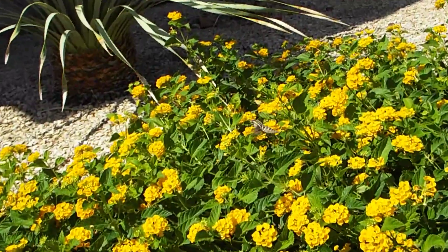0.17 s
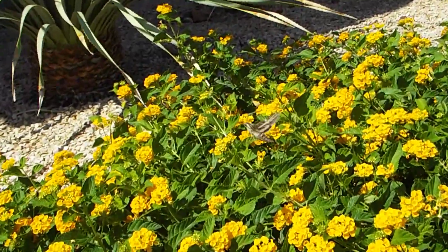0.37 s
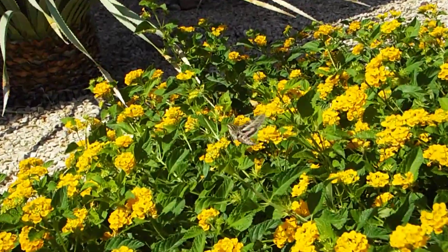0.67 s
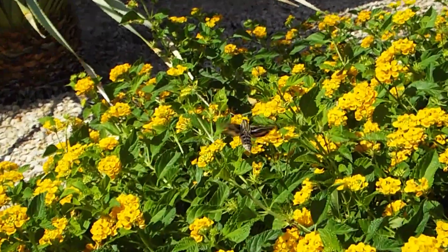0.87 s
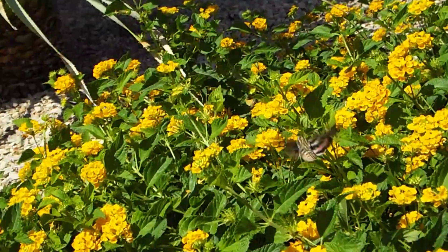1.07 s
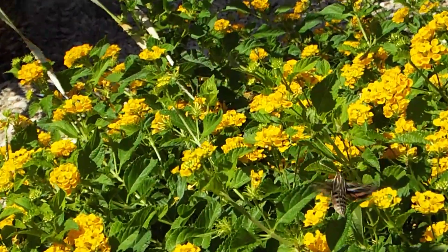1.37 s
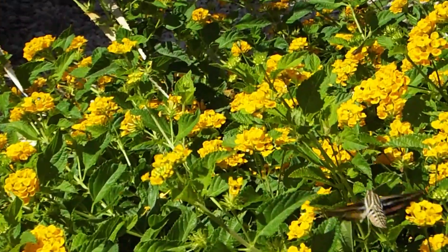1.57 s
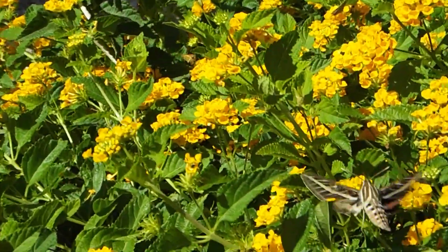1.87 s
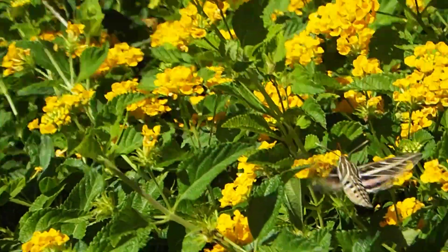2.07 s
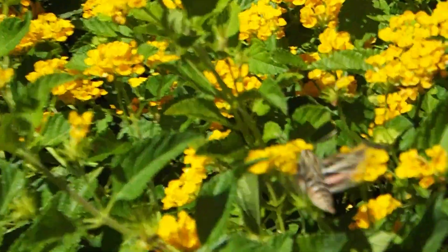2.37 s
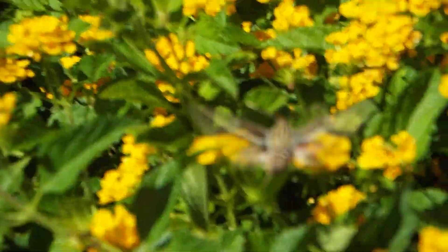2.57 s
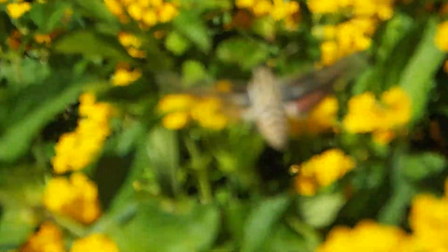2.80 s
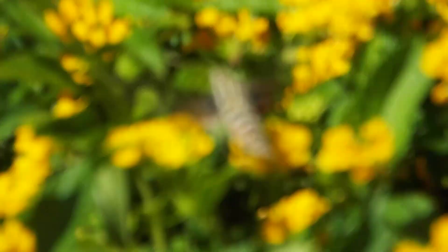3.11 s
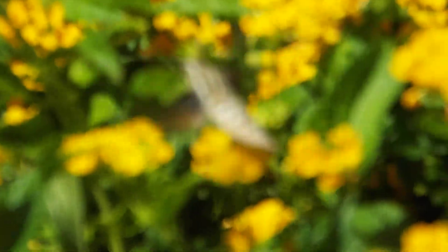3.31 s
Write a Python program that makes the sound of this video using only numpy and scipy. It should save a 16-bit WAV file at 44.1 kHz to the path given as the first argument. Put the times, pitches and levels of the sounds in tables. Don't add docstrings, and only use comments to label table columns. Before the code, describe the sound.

Close buzzy whirr of a camera zoom motor with light case ticks, ending abruptly outdoors.

```python
import sys
import numpy as np
from scipy import signal
from scipy.io import wavfile
from scipy.ndimage import uniform_filter1d

SR = 44100
rng = np.random.default_rng(int(sys.argv[2]) if len(sys.argv) > 2 else 0)


def makeup_ratio(level_db):
    decades = np.asarray(level_db, float) / 20
    return 10 ** decades


def unload_wav(signal):
    wavfile.write(
        sys.argv[1],
        SR,
        np.round(np.clip(np.atleast_2d(signal).T, -1, 1) * 32767).astype(np.int16),
    )


N = 152145


def evened(x):
    return x / np.sqrt(np.mean(x ** 2) + 1e-20)


def read(points, hz):
    point_hz, value = np.transpose(points)
    return np.interp(np.log(hz + 1), np.log(point_hz + 1), value)


def filtered(x, order, hz, kind="low"):
    return signal.sosfilt(signal.butter(order, hz, kind, fs=SR, output="sos"), x)


def slow(hz):
    return evened(filtered(rng.standard_normal(N), 2, hz))


def ring(x, hz, t60_s):
    t = np.arange(1500) / SR
    mode = makeup_ratio(-60 * t / t60_s) * np.sin(2 * np.pi * hz * t)
    return signal.oaconvolve(x, mode)[:len(x)]


def add(mix, start_s, sound):
    part = mix[:, round(start_s * SR):][:, :sound.shape[1]]
    part += sound[:, :part.shape[1]]


def rumble():
    # freq [Hz], density [dB per Hz]
    air = [(20, -3.5), (60, -0.5), (200, -8.5), (350, -18), (650, -20.5), (1000, -28.5), (5000, -36.5),
           (16000, -48)]
    # center_hz [Hz], width_hz [Hz], level_db [dB]
    hums = [(60.5, 6, -57), (115, 16.2, -55.5), (168, 3, -75.5), (250, 5.3, -65.5)]
    # freq [Hz], correlation [-]
    likeness = [(30, 0.6), (80, 1.03), (300, 0.8), (900, 1.05), (4000, .5), (15000, 0.5)]
    # freq [Hz], left_over_right_db [dB]
    balance = [(60, 5.3), (300, 4), (900, 4.5), (4000, 2.4), (15000, 2.1)]
    wash_db, patch_db = -51, 1.47

    frames, hz = N // 1024 + 5, np.fft.rfftfreq(4096, 1 / SR)
    a, b, c, d, patches = rng.standard_normal((frames, 2049, 5)).T
    patches = uniform_filter1d(patches, size=12, axis=0)
    patches = evened(uniform_filter1d(patches, size=4, axis=1))

    wash = makeup_ratio(2 * read(air, hz))
    power = makeup_ratio(2 * wash_db) * wash / wash.sum()
    for center_hz, width_hz, level_db in hums:
        hum = np.exp(-((hz - center_hz) / width_hz) ** 2)
        power = power + makeup_ratio(2 * level_db) * hum / hum.sum()

    same = np.clip(read(likeness, hz), -1, 1)[:, None]
    left = a + 1j * b
    right = same * left + np.sqrt(1 - same ** 2) * (c + 1j * d)
    gain = np.sqrt(power) * makeup_ratio(np.outer([.5, -.5], read(balance, hz)))
    spectra = np.array([left, right]) * gain[:, :, None] * makeup_ratio(patch_db * patches)
    out = signal.istft(spectra, nperseg=4096, noverlap=3072)[1][:, 2048:N + 2048]
    return evened(out) * np.sqrt(power.sum())


def finger_ticks(mix, t, lean):
    # start_s [s], peak_db [dB], ring_hz [Hz]
    ticks = [(0.41, -61, 1010), (.681, -41, 900), (0.779, -38, 1110), (0.833, -31.5, 1180),
             (0.858, -31, 1170), (0.94, -42, 1130), (0.957, -30, 1110), (.998, -46, 1010),
             (1.075, -33, 1110), (1.143, -36.5, 1200), (1.252, -31, 1080), (1.33, -37, 1150),
             (1.541, -38, 524)]
    decay_s, ring_t60_s, ring_db = 0.00098, .022, -1.5
    for start_s, peak_db, ring_hz in ticks:
        burst = rng.standard_normal(len(t)) * np.exp(-t / decay_s)
        thud = filtered(burst, 1, [150, 2300], "band")
        tick = evened(thud) + makeup_ratio(ring_db) * evened(ring(burst, ring_hz, ring_t60_s))
        add(mix, start_s, makeup_ratio(peak_db) * lean * tick / abs(tick).max())


def soft_bump(mix, t, lean):
    start_s, peak_db, length_s, top_hz = 2.85, -41, .033, 700
    bump = filtered(rng.standard_normal(len(t)), 2, [150, top_hz], "band")
    bump = bump * np.sin(np.pi * np.minimum(t / length_s, 1)) ** 2
    add(mix, start_s, makeup_ratio(peak_db) * lean * bump / abs(bump).max())


def lever_clicks(mix, t):
    # start_s [s], peak_db [dB], length_s [s], left_over_right_db [dB], spring_db [dB]
    clicks = [
        (1.1445, -27, .001, 4, -20),
        (3.0155, -21.5, .003, 6, -12),
        (3.1093, -15, .006, 1.5, -2.5),
        (3.262, -54, .012, 5, -20),
        (3.272, -48, .011, 8, -20),
        (3.313, -54, .011, 4, -20),
        (3.39, -57, .025, 3, -20),
    ]
    # mode_hz [Hz], mode_db [dB], t60_s [s]
    lever = [(1500, -4, .009), (1950, 0, .006), (2800, -1.5, .006), (3300, -3, .005), (3900, 0, .005),
             (4600, -2, .004), (5200, 1.5, .005), (5900, 5, .006), (11800, -4, .005)]
    spring_hz, spring_t60_s = 2250, .022
    for start_s, peak_db, length_s, pan_db, spring_db in clicks:
        scrape = rng.standard_normal((2, len(t))) * np.sin(np.pi * np.minimum(t / length_s, 1)) ** 2
        scrape[1] = .8 * scrape[0] + .6 * scrape[1]
        click = []
        for x in scrape:
            spring = makeup_ratio(spring_db - 0.5) * ring(x, spring_hz, spring_t60_s)
            click.append(spring + sum(makeup_ratio(mode_db) * ring(x, hz, t60_s) for hz, mode_db, t60_s in lever))
        click = filtered(np.array(click), 4, 1200, "high")
        pan = makeup_ratio([[pan_db / 2], [-pan_db / 2]])
        add(mix, start_s, makeup_ratio(peak_db) * pan * click / abs(click).max())


def handling():
    mix, t = np.zeros((2, N)), np.arange(1500) / SR
    lean = makeup_ratio([[1.5], [-1.5]])
    finger_ticks(mix, t, lean)
    soft_bump(mix, t, lean)
    lever_clicks(mix, t)
    return filtered(mix, 3, 8000)


def cases():
    # mode_hz [Hz], width_hz [Hz], level_db [dB]
    left_modes = [(1080, 95, -11.5), (1267, 224, -14), (1630, 50, -15), (1984, 330, -8), (2495, 244, -10.5),
                  (2795, 200, -11.5), (3205, 140, -10), (3720, 256, -4.5), (4150, 270, -10),
                  (4545, 390, -2), (6330, 1070, -9.5), (7700, 410, -11.5), (8570, 830, -16),
                  (10280, 1650, -25)]
    # mode_hz [Hz], width_hz [Hz], level_db [dB]
    right_modes = [(1080, 230, -15.5), (1310, 124, -17), (1440, 240, -22.5), (1570, 140, -31),
                   (2006, 215, -11), (2870, 1500, -19.5), (3520, 260, -12.5), (4320, 700, -13.5),
                   (5730, 460, -7.5), (6320, 780, -16.5), (7130, 900, -14.5), (8900, 1730, -24.5),
                   (10500, 630, -31), (12000, 370, -51)]
    # freq [Hz], phase [rad]
    lead = [(1380, 0.6), (1980, 1.14), (2330, 1.8), (3620, 1.2), (4130, 2.25), (4820, 4.85), (7060, 7.48),
            (10000, 14.53)]
    leak_db = -70
    hz = np.fft.fftfreq(4096, 1 / SR)

    def log_gain(modes):
        power = makeup_ratio(2 * leak_db)
        for mode_hz, width_hz, level_db in modes:
            power = power + makeup_ratio(2 * level_db) / (1 + ((abs(hz) - mode_hz) / width_hz) ** 2 * 2) ** 2
        return .5 * np.log(power)

    left, right = log_gain(left_modes), log_gain(right_modes)
    phase = -signal.hilbert(left).imag
    right_phase = phase - np.sign(hz) * read(lead, abs(hz))
    both = np.exp([left + 1j * phase, right + 1j * right_phase])
    return np.roll(np.fft.ifft(both).real, 200, axis=1)[:, :2048]


def motor_tone(angle):
    odd_db = [-12, -10, 3, -2, -8, -4, -1.5, -1, -7.5, -8, -8, -8, -8, -8, -8, -7, -6, -7, -9]
    even_db, shimmer_db = -16, 1.7
    tone = np.zeros(N)
    for k, level_db in enumerate(odd_db):
        odd = np.cos((2 * k + 1) * angle + 7 * rng.random())
        even = np.cos((2 * k + 2) * angle + 7 * rng.random())
        tone += makeup_ratio(level_db + shimmer_db * slow(60)) * (odd + makeup_ratio(even_db) * even)
    return tone


def brush_hiss(angle):
    depth, shared = 0.21, 0.63
    noise = rng.standard_normal((3, N))
    hiss = shared * noise[0] + np.sqrt(1 - shared ** 2) * noise[1:]
    return hiss * (1 + depth * np.cos(angle))


def motor():
    # time_s [s], turns_done [turns]
    gear = [(0.017, 0), (0.306, 5), (0.375, 6), (0.846, 14), (1.036, 17), (1.228, 21), (1.297, 22),
            (1.529, 26), (1.74, 30), (1.977, 34), (2.024, 35), (2.149, 37), (2.38, 41), (2.468, 43),
            (2.829, 50), (2.91, 51), (2.974, 52), (3.21, 57)]
    # time_s [s], slowest_hz [Hz], fastest_hz [Hz], level_db [dB]
    swing = [
        (0, 230, 294, -.8),
        (1.2, 230, 294, -.4),
        (1.6, 240, 292, 0),
        (2.55, 238, 292, .2),
        (2.8, 246, 280, -.2),
        (3.2, 247, 280, -.4),
    ]
    slow_at_turn, loud_at_turn = .33, .85
    climb_turn, bend, swing_spread = .8, 1.5, .18
    wander_hz, jitter_hz = 2.5, 1.5
    tone_db, tone_throb_db, turn_db = -13.5, 3.2, .8
    hiss_db, hiss_throb_db, hiss_drift_db = -2, 0.5, 0.4
    motor_db, stop_s, coast_s, stop_db_per_s = -44, 3.212, 0.025, 798

    t = np.arange(N) / SR
    s, done = np.transpose(gear)
    turns = np.interp(t, np.r_[s[0] - 1, s, s[-1] + 1], np.r_[done[0] - 18, done, done[-1] + 18])
    phase_turn = (turns - slow_at_turn) % 1
    luck = rng.standard_normal((80, 2))[(turns - slow_at_turn + 2).astype(int)]

    climb = (phase_turn / climb_turn) ** bend
    snap = .5 + .5 * np.cos(np.pi * (phase_turn - climb_turn) / (1 - climb_turn))
    rise = np.where(phase_turn < climb_turn, climb, snap)
    swing_s, low_hz, high_hz, level_db = np.transpose(swing)
    low_hz, high_hz = np.interp(t, swing_s, low_hz), np.interp(t, swing_s, high_hz)
    hz = low_hz + (high_hz - low_hz) * rise * (1 + swing_spread * luck[:, 0])
    hz = hz + wander_hz * slow(26.8) + jitter_hz * slow(380)
    angle = 2 * np.pi * np.cumsum(hz) / SR

    throb = np.cos(2 * np.pi * (turns - loud_at_turn))
    tone_level_db = tone_db + tone_throb_db * throb + turn_db * uniform_filter1d(luck[:, 1], size=400)
    tone_level_db = tone_level_db - stop_db_per_s * np.maximum(t - stop_s + coast_s, 0)
    hiss_level_db = hiss_db + hiss_throb_db * throb + hiss_drift_db * slow(40)
    drive = motor_tone(angle) * makeup_ratio(tone_level_db) + brush_hiss(angle) * makeup_ratio(hiss_level_db)
    drive = drive * makeup_ratio(np.interp(t, swing_s, level_db) - stop_db_per_s * np.maximum(t - stop_s, 0))
    out = np.array([signal.oaconvolve(d, h)[200:N + 200] for d, h in zip(drive, cases())])
    return makeup_ratio(motor_db + 2.5) * evened(out)


def scene():
    return rumble() + handling() + motor()


def top_cut(x):
    return signal.sosfilt(signal.butter(12, 16120, fs=SR, output="sos"), x)


def record(dry):
    lowpass = signal.firwin(1023, 15740, window=("kaiser", 9), fs=SR)
    limited = signal.oaconvolve(dry, lowpass[None], "same")
    return top_cut(limited)


dry = scene()
out = record(dry)
unload_wav(out)
```